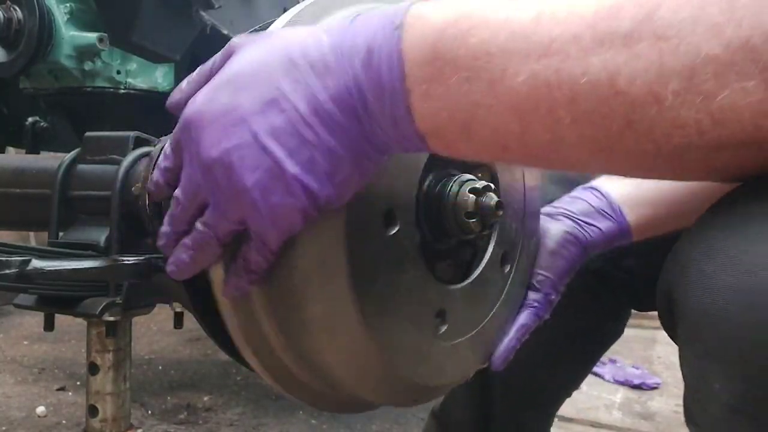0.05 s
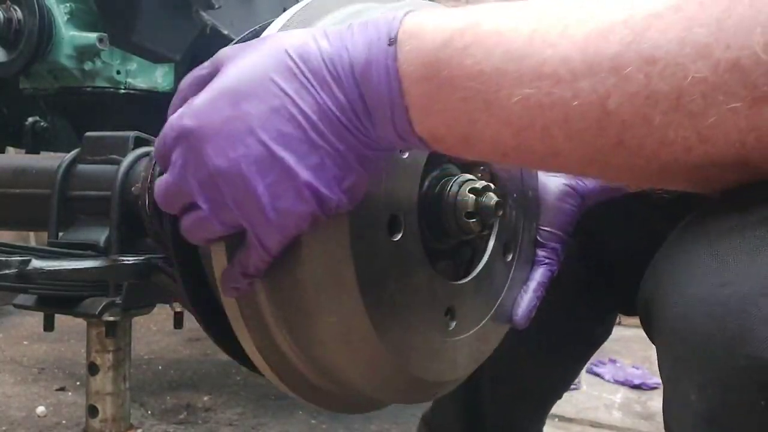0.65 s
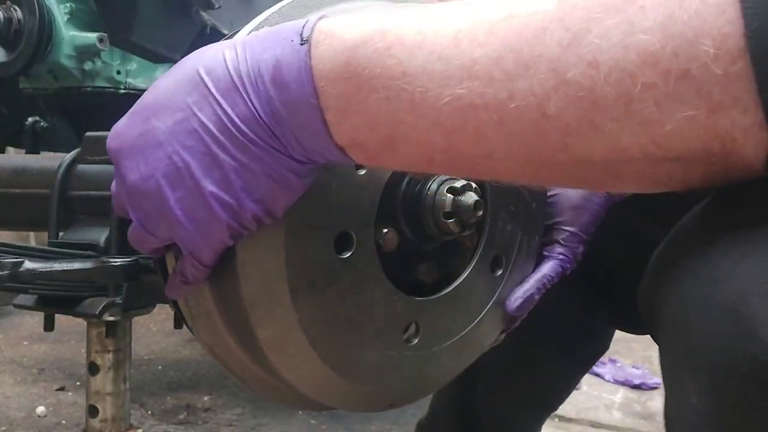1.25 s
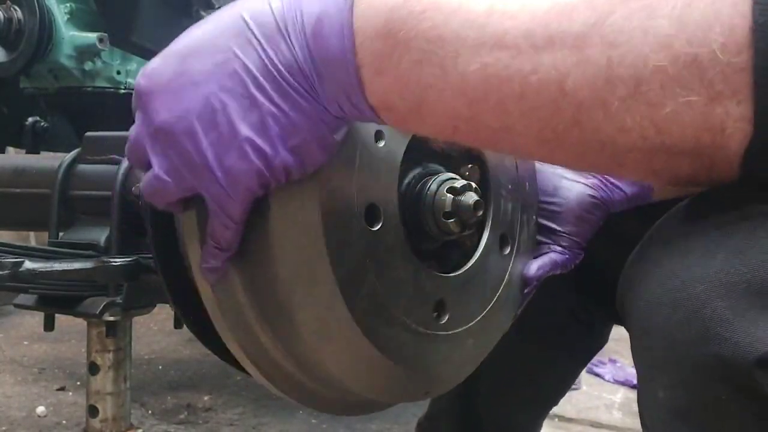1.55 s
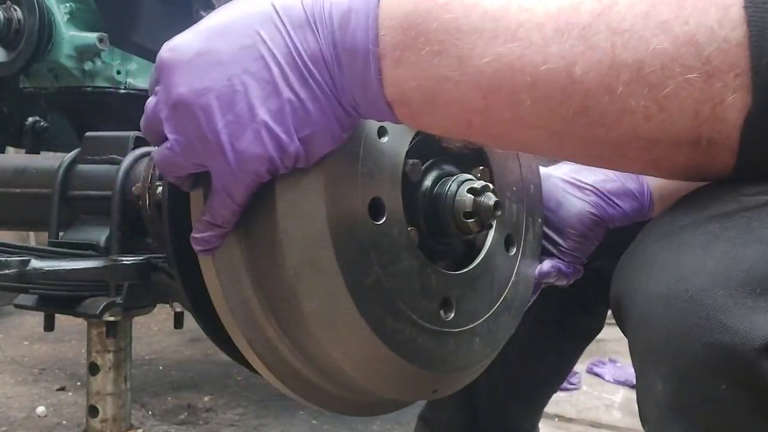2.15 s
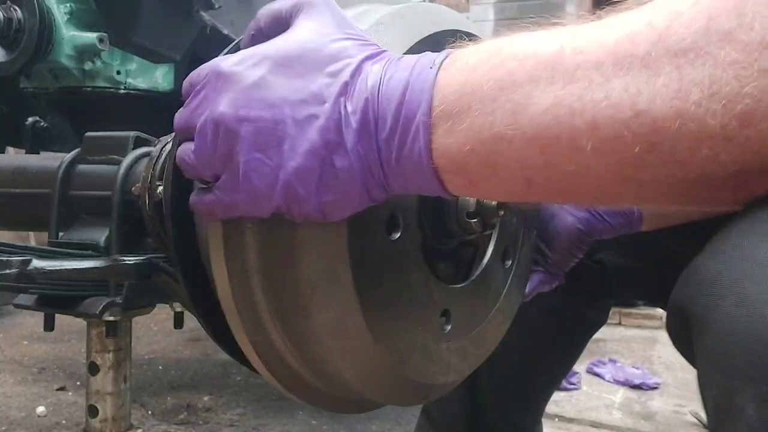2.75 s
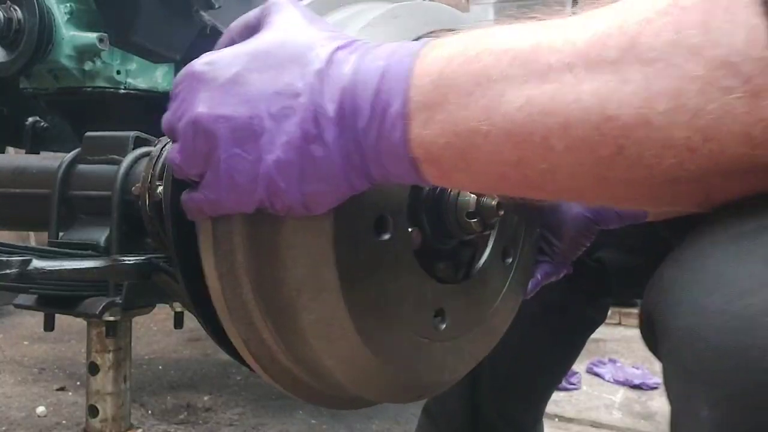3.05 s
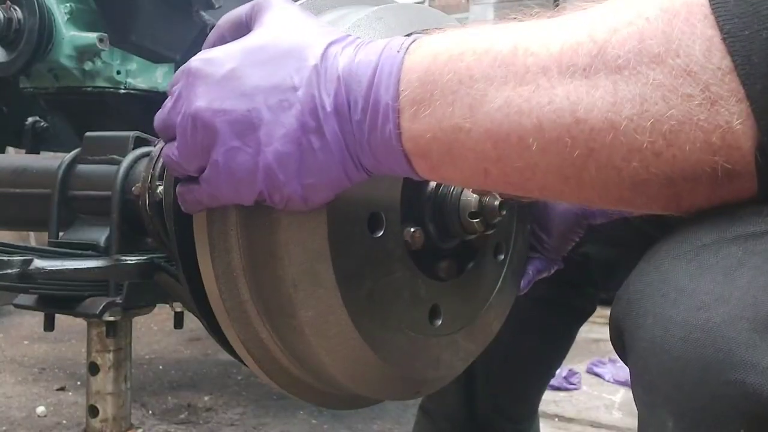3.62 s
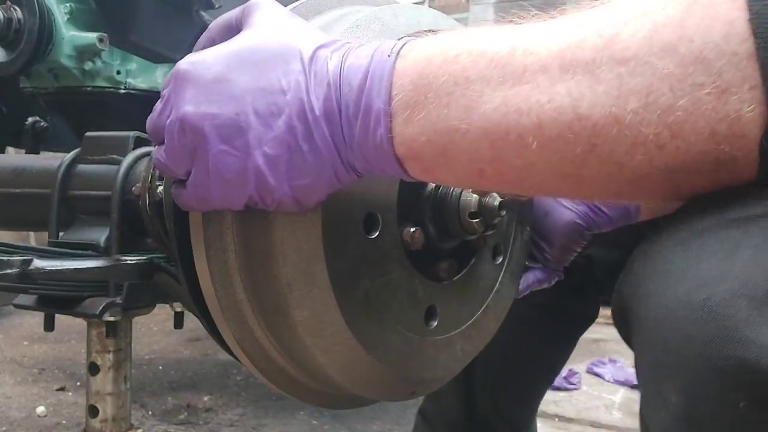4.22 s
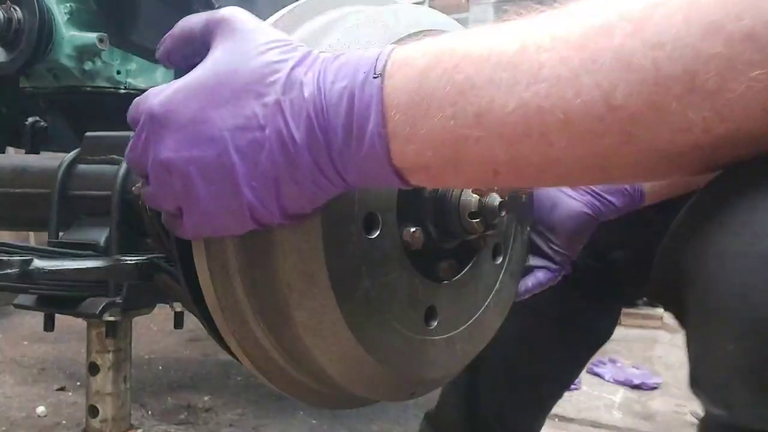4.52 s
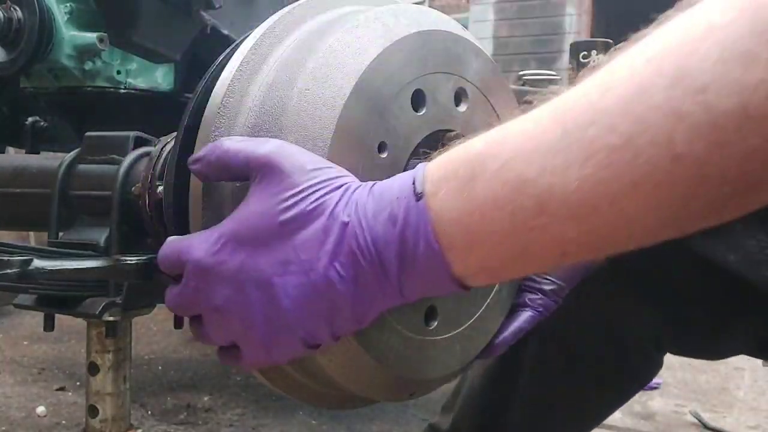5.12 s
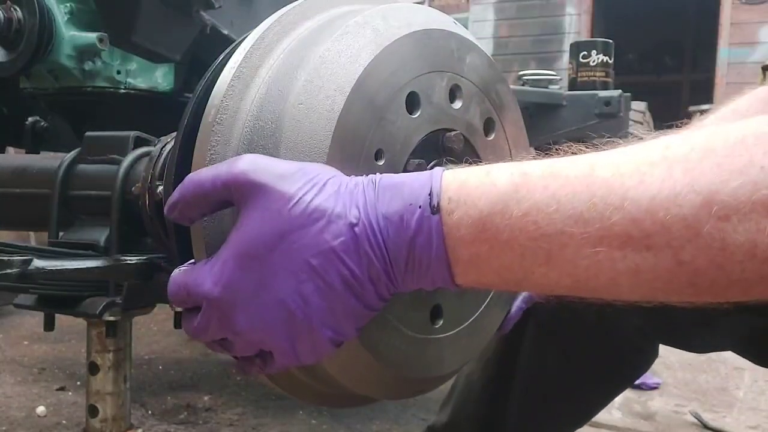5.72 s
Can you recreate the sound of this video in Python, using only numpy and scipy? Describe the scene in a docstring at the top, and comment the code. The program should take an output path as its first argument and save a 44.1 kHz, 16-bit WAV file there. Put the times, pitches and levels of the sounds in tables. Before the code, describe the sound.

A metal brake drum rubs and scrapes onto its hub, with ringing clanks, hollow bumps and swishing gloves in a quietly rumbling workshop.

```python
"""Iron rubs, clangs and bumps close by: a cast-iron brake drum is worked onto its hub in a workshop.
The drum drags over the brake shoes, judders forward in quick slips and rings when it strikes the hub.
Twisted on its seat, it bumps with a hollow note, and the axle rattles and hums.
Gloves and sleeves swish over the iron while the room rumbles quietly."""
import sys
import numpy as np
from scipy import signal
from scipy.fft import rfft, irfft, next_fast_len
from scipy.io import wavfile
from scipy.ndimage import map_coordinates

SR = 44100
rng = np.random.default_rng(int(sys.argv[2]) if len(sys.argv) > 2 else 0)


def store_pcm(level_fs):
    """Save levels as 16-bit WAV."""
    pcm = np.round(np.clip(level_fs, -1, 1) * 32767).astype(np.int16)
    wavfile.write(sys.argv[1], SR, np.atleast_2d(pcm).T)


N = 254456

# the axle's many crowded tones, heard as a rattle: f/Hz, level/dB
AXLE_RATTLE = [(40, -40.5), (100, -8.5), (230, -8), (330, 0), (480, 1), (750, 1), (950, -3), (1350, -7.5),
               (1750, -15), (3000, -15.5), (5000, -19.5), (8500, -16), (14000, -49)]


def clangs():
    """Each blow rings the drum, the shoes and their backplate, and makes the axle rattle and thud."""
    # blows: t/s, level/dB, hardness/Hz, drum ring/dB, plate ring/dB, thud/dB, thud pitch/Hz
    blows = [(1.221, -39, 262, -25, -14, -0.5, 139), (1.906, -59, 2960, 23.5, -21, -1, 190),
             (1.943, -29, 3100, -11.5, -9, 1, 278), (1.969, -34.5, 1900, 2.5, -4, 8.5, 130),
             (1.999, -40.5, 900, -17, -1, 10, 165), (2.181, -37.5, 880, -6.5, -12.5, -2, 340),
             (2.725, -49.5, 1150, -3.5, 1.5, 4.5, 300), (2.907, -50, 11700, 16.5, 4.5, 4.5, 189),
             (2.930, -53, 9000, 14, -5, 13, 330), (3.3677, -19.5, 3800, 6, -6.5, -8, 356),
             (3.374, -25, 2500, 7, -4.5, -0.5, 330), (3.879, -33, 650, -1.5, -1, 3.5, 322),
             (3.980, -51, 990, -9, -9, 3, 342), (5.539, -31, 760, -11, -24, 1.5, 164)]
    # tones of the bending drum; close neighbours throb slowly: f/Hz, level/dB, time to fade 60 dB/s
    drum_tones = [(947, -23, .28), (1082, -23, .27), (1242, -3, .39), (1252, -10.5, .44), (1305, -12, .15),
                  (1400, -8, .13), (1470, -2.5, .2), (1561, -19, .26), (2065, -15, .47),
                  (2067.8, -18.5, .47), (2073.3, -21, .47), (2110, -22, .25), (2748, -15, .21),
                  (3118, -9.5, .34), (3128, -18, .28), (3890, -21, .23), (4115, -21, .23), (4425, -23, .3)]
    # tones of the shoes and backplate: f/Hz, level/dB, time to fade 60 dB/s
    plate_tones = [(163.3, -12, 1), (329, -2, 0.49), (388, -8, 0.17), (423, -3, 0.65), (495, -2.5, 0.57),
                   (553, 0, .42), (573, -3, .36), (662, -7, .7), (716, 1.5, .3), (998, 1.5, 0.11),
                   (1409, 6.5, 0.13)]
    # the drum sends its sound out unevenly: f/Hz, left minus right/dB
    balance = [(250, 0), (700, -2), (1050, 0), (1240, -6), (1470, 4), (2100, 0), (2750, -5), (3120, 8),
               (8000, 0)]
    out, t = np.zeros((2, N)), np.arange(SR) / SR
    for s, db, hard_hz, drum_db, plate_db, thud_db, thud_hz in blows:
        # the shoes sit a little differently at every blow, which retunes them
        shoes = np.array(plate_tones) * [1 + .01 * rng.standard_normal(), 1, 1]
        drum = ring(drum_tones, hard_hz, rough=.4)
        # a very hard, glancing touch barely stirs the drum's low tones
        drum = filtered(drum, lambda hz: 1 / np.hypot(1, (hard_hz / (6 * hz + 1)) ** 2))
        iron = amp(drum_db) * drum + amp(plate_db) * ring(shoes, hard_hz, rough=.6)
        rattle = wash(colour(AXLE_RATTLE), hard_hz, fade=.18, room_db=-8, attack_s=.0007)
        thud = wash(hump(thud_hz, octaves=.43), hard_hz=700, fade=.21, room_db=-11, attack_s=.0026)
        add(out, s, amp(db) * (iron + rattle + amp(thud_db) * thud))
    return filtered(out, lambda hz: amp(along(balance, hz) * np.array([[.5], [-.5]])))


def bumps():
    """The drum meets its seat: a clack, then its hollow swells into a lower note as the axle rattles."""
    # bumps on the seat: t/s, level/dB, body/dB, treble/dB
    hits = [(3.794, -30.5, 1.5, -0.5), (4.096, -28.5, -1.5, -8.5), (4.303, -34.5, 3.5, -8.5),
            (5.5045, -24.5, 1.5, 1), (5.677, -30, 0, -19)]
    # tones of the hollow, the low ones mostly later: f/Hz, level/dB, time to peak/s, narrowness of swell
    hollow_tones = [(333, -26.5, 0.026, 1.2), (390, -10.5, 0.018, 0.71), (421, -6, 0.027, 8.1),
                    (551, -3, 0.055, 6.8), (589, -2, 0.018, 6.5), (700, -4, 0.0079, 0.27),
                    (758, 0.5, 0.0073, 2.9), (999, -6.5, 0.0033, 0.23), (1238, -4, 0.0029, 0.79),
                    (1310, -12, 0.0049, 0.22)]
    # top of the body range, the neutral middle, start of the full treble: f/Hz
    bands = [610, 714, 1190]
    out, t = np.zeros((2, N)), np.arange(SR) / SR
    for s, db, body_db, treble_db in hits:
        sound = amp(-2) * wash(colour(AXLE_RATTLE), hard_hz=1760, fade=.25, room_db=-3, attack_s=.0012)
        for hz, tone_db, peak_s, narrow in hollow_tones:
            swell = (t / peak_s * np.exp(1 - t / peak_s)) ** narrow
            phase = rng.uniform(0, 2 * np.pi) + .7 * stereo_phase(hz) + .45 * waver(t)
            strength = amp(tone_db + rng.standard_normal())
            sound += strength * swell * np.sin(2 * np.pi * hz * t + phase)
        tilt = colour(list(zip(bands, [body_db, 0, treble_db])))
        add(out, s, amp(db) * filtered(sound, tilt))
    return out


def shove():
    """One hard shove makes the drum judder over the shoes in quick, uneven slips."""
    # the hard push: t/s, held/s, level/dB
    push = [(1.906, 0.047, -26)]
    # tone colour of grinding iron: f/Hz, level/dB
    grind = [(88, -2.5), (150, -3.5), (281, -5), (320, -10), (402, -10.5), (725, -12), (782, -25.5),
             (1160, -7), (1260, -16.5), (1490, -8.5), (1980, -21.5), (2490, -15.5), (3440, -27),
             (4480, -24.5), (14000, -45)]
    slips = unit(amp(2.8 * wobble(170)))
    force = strokes(push, rise=1108, sag=-3, fall=130.5)
    return force * slips * noise(metallic(colour(grind), ripple_db=2.5))


def rubbing():
    """Rough iron drags on the brake linings and stirs the muffled tones of drum and shoes."""
    # pushes on the drum: t/s, held/s, level/dB
    pushes = [(0.0, 0.0055, -47), (.13, 0.14, -48), (.22, 0.047, -44), (.54, 0.055, -49), (.82, 0.077, -50),
              (1.825, 0.0066, -49.5), (2.21, 0.38, -49), (2.905, 0.059, -46), (3.35, 0.025, -44),
              (5.24, 0.11, -54.5), (5.495, 0.075, -40)]
    # tones of drum and shoes pressed together: f/Hz, width/Hz, level/dB
    lining_tones = [(390, 200, -3.5), (580.3, 17.6, 7.5), (716, 50, 1.5), (1174, 135, -6.5), (1398, 77, 1),
                    (2500, 560, -16.5)]
    force = strokes(pushes, rise=298, sag=5.5, fall=123.5)
    return force * unit(filtered(friction(uneven_db=3), metallic(resonances(lining_tones), ripple_db=4)))


def scraping():
    """The rim grazes the steel edges of the shoes; every slip rings its high tones."""
    # grazes of the rim: t/s, held/s, level/dB
    grazes = [(.14, 0.043, -47.5), (.26, 0.013, -51.5), (.57, 0.018, -62), (.745, 0.012, -57),
              (.872, 0.013, -50.5), (2.592, 0.0098, -50)]
    # tones of the rim, muffled by the hands: f/Hz, level/dB
    rim_tones = [(2640, -3), (2900, 0), (3270, -2), (3580, 1.5), (3800, 1.5), (4250, -2), (4440, -3)]
    width_hz = 45
    rim = resonances([(hz, width_hz, db) for hz, db in rim_tones])
    force = strokes(grazes, rise=450, sag=0, fall=222)
    return force * unit(filtered(friction(uneven_db=5), rim))


def brief_sounds():
    """Scuffs, squeaks, brief rings of the drum, the sharp cracks of knocks, and ticks of grit."""
    # scuffs, squeaks, rings and cracks: t/s, level/dB, f/Hz, width/octaves, time to fade 60 dB/s
    bursts = [(.104, -48, 2600, 0.61, 0.16), (.143, -38, 3930, 11, 0.1), (.812, -50, 720, 1.2, 0.16),
              (1.905, -25, 1385, 0.092, 0.25), (1.905, -25, 2060, 0.11, 0.17),
              (1.942, -36.5, 3800, 0.46, 0.088), (1.945, -22.5, 1298, 0.031, 0.29),
              (1.945, -26, 1469, 0.0086, 0.34), (2.181, -36.5, 636, 0.3, 0.056), (2.26, -43, 715, .08, .16),
              (2.723, -42, 4100, 0.12, 0.09), (2.908, -37, 2200, 0.81, 0.053),
              (2.908, -42.5, 2110, .025, 0.24), (3.29, -51.5, 940, 0.83, 0.98),
              (3.369, -37.5, 4380, 0.35, 0.054), (3.878, -30, 1550, 0.56, 0.036),
              (4.096, -41, 1130, 0.87, 0.035), (5.23, -40, 477, 3, 0.35), (5.505, -32.5, 1450, 0.69, 0.066)]
    # dry ticks of grit and glove rubber: t/s, level/dB
    ticks = [(1.447, -46), (2.597, -40), (3.662, -47), (4.821, -42), (5.032, -47), (5.246, -33.5)]
    out = np.zeros((2, N))
    for s, db, centre_hz, octaves, fade_s in bursts:
        add(out, s, amp(db) * burst(centre_hz, octaves, fade_s))
    for s, db in ticks:
        add(out, s, amp(db) * burst(centre_hz=5400, octaves=2.4, fade_s=.02))
    return out


def axle_hum():
    """One low tone of the axle swells, wavers and is stilled again by the hands."""
    # hums after the shove and the blows: t/s, held/s, level/dB
    hums = [(2.0, 0.15, -34.5), (3.54, 0.025, -36.5), (3.68, 0.02, -45.5), (3.93, 0.34, -48)]
    pitch_hz = 159
    tone = unit(np.sin(2 * np.pi * pitch_hz * np.arange(N) / SR + wobble(25)))
    return tone * strokes(hums, rise=263, sag=19, fall=144)


def swish():
    """Gloves and sleeves slide over dusty iron with a grainy, uneven hiss."""
    # hand movements: t/s, held/s, level/dB
    slides = [(0.0, 0.025, -54), (.14, 0.025, -43.5), (.21, 0.073, -51), (.37, 0.017, -49),
              (.535, 0.055, -46.5), (.755, 0.03, -46), (.86, 0.025, -48.5), (.96, .11, -52),
              (1.14, .14, -68), (1.295, 0.013, -61), (1.41, 0.043, -53), (1.555, 0.039, -58),
              (1.7, 0.091, -49.5), (1.925, 0.15, -47), (2.17, 0.79, -53), (2.59, 0.14, -48),
              (2.905, 0.035, -49.5), (3.01, 0.075, -58.5), (3.14, 0.053, -65), (3.33, 0.045, -55.5),
              (3.5, 0.09, -51.5), (3.66, .01, -56.5), (3.8, 0.11, -60.5), (4.31, 0.011, -66),
              (4.44, 0.19, -68), (4.65, 0.054, -57.5), (4.86, 0.0047, -52.5), (4.98, .1, -60.5),
              (5.12, 0.127, -54.5), (5.255, 0.17, -42.5), (5.51, 0.044, -40.5), (5.765, .01, -51.5)]
    # tone colour of cloth on iron: f/Hz, level/dB
    cloth = [(300, -21), (900, -4.5), (1900, -1.5), (3600, 0), (5500, -2), (8000, -3.5), (9500, -8),
             (11500, -4), (14500, -10)]
    grain = unit(amp(1.8 * wobble(1500) + 1.4 * wobble(80) + .7 * wobble(22)))
    hiss = noise(metallic(colour(cloth), ripple_db=2.2))
    speed = strokes(slides, rise=206, sag=13, fall=140)
    return speed * grain * hiss * amp([[.5], [-.5]])  # slightly to the left


def workshop():
    """A low rumble swells when the axle rocks on its spring; the room hisses faintly."""
    # shifts of weight that rock the axle: t/s, held/s, level/dB
    heaves = [(0.0, 0.27, -43), (.9, 0.047, -50), (1.26, 0.017, -41.5), (1.97, 0.061, -38),
              (2.3, 0.82, -44.5), (3.42, 0.21, -40), (3.9, 1.2, -51.5), (5.54, 0.26, -44)]
    # tone colour of the rumble: f/Hz, level/dB
    rumble = [(20, -45.5), (33, -17), (45, 1), (55, 3.5), (65, 0), (77, 4.5), (95, -7.5), (130, -9),
              (160, -11.5), (200, -22.5), (330, -16), (600, -30.5), (1200, -93.5)]
    # tone colour of the room's steady hiss: f/Hz, level/dB
    air = [(25, -28.5), (100, 2.5), (330, -9), (600, -10.5), (1200, -15), (2300, -26), (3000, -46.5),
           (8000, -31.5), (9500, -42.5), (12000, -31), (15000, -34)]
    resting_db, air_db = -48.5, -57
    rocking = strokes(heaves, rise=289.5, sag=2.5, fall=48)
    return np.hypot(amp(resting_db), rocking) * noise(colour(rumble)) + amp(air_db) * noise(colour(air))


def ring(tones, hard_hz, rough):
    """One second of struck iron: its tones start nearly in step, waver under the hands and fade."""
    t = np.arange(SR) / SR
    out = np.zeros((2, SR))
    for hz, db, fade_s in tones:
        phase = .5 * rng.standard_normal() + stereo_phase(hz) + rough * waver(t)
        strength = amp(db + rng.standard_normal()) * contact(hz, hard_hz)
        out += strength * amp(-60 * t / fade_s) * np.sin(2 * np.pi * hz * t + phase)
    return out * (1 - np.exp(-t / .0011))


def wash(response, hard_hz, fade, room_db, attack_s):
    """One second of crowded tones: a quick burst whose treble dies first, then the room's echo."""
    # the workshop's echo: f/Hz, time to fade 60 dB/s
    echo_times = [(70, 2.5), (170, 0.96), (500, 0.71), (1200, 0.54), (4000, 0.82), (12000, 0.272)]
    hz, t, spectrum = signal.stft(noise(response, size=SR), SR, nperseg=256)
    hz = hz[:, None]
    direct = amp(-60 * t / fade * (1 + hz / 1000) ** .13)
    echo = amp(room_db - 60 * t / along(echo_times, hz))
    sound = signal.istft(spectrum * np.hypot(direct, echo) * contact(hz, hard_hz), SR, nperseg=256)[1]
    return sound[:, :SR] * (1 - np.exp(-np.arange(SR) / SR / attack_s))


def burst(centre_hz, octaves, fade_s):
    """One second of fading noise around one pitch, with a faint echo. Low bursts start more softly."""
    t = np.arange(SR) / SR
    echo = amp(-19 - 60 * t / .4)
    attack = 1 - np.exp(-2 * t * centre_hz)
    return noise(hump(centre_hz, octaves), size=SR) * (amp(-60 * t / fade_s) + echo) * attack


def contact(hz, hard_hz):
    """A soft touch lasts longer, so it stirs less treble."""
    return 1 / np.sqrt(1 + (hz / hard_hz) ** 4.5)


def friction(uneven_db):
    """The force of sliding on rough iron: a stream of tiny slips of unequal size."""
    return amp(uneven_db * wobble(260)) * noise(np.ones_like)


def strokes(rows, rise, sag, fall):
    """Loudness of movements that swell, sag while held and die. Slopes: dB/s at the top, steeper below."""
    t = np.arange(0, N, 32) / SR
    power = np.zeros(len(t))
    for s, held, db in rows:
        drop = rise * np.maximum(s - t, 0) + sag * np.clip(t - s, 0, held)
        drop += fall * np.maximum(t - s - held, 0)
        power += amp(db - drop * (1 + drop / 93)) ** 2  # a drop of 93 dB is doubled
    return np.interp(np.arange(N) / SR, t, np.sqrt(power))


def resonances(tones):
    """Response (gain at each frequency) of an object that rings at the given tones."""
    return lambda hz: sum((-1) ** k * amp(db) * 1j * hz * width / (centre ** 2 - hz ** 2 + 1j * hz * width)
                          for k, (centre, width, db) in enumerate(tones))


def metallic(response, ripple_db):
    """The crowded high tones of iron cut fine peaks and dips into a response."""
    grid = np.arange(0, SR / 2, 45)
    ripple = rng.standard_normal(len(grid)) * (grid > 1600)
    return lambda hz: response(hz) * amp(ripple_db * np.interp(hz, grid, ripple))


def hump(centre_hz, octaves):
    """Response with one rounded peak."""
    away = lambda hz: np.log2((hz + 1) / centre_hz) / octaves
    return lambda hz: (1 + away(hz) ** 2) ** -1.3 * np.exp(-away(hz) ** 2 / 12)


def colour(points):
    """Response drawn through points of f/Hz, level/dB."""
    return lambda hz: amp(along(points, hz))


def noise(response, size=N):
    """Stereo noise shaped by a response, nearly the same on both sides in the bass."""
    white = rng.standard_normal((2, size))
    mid, side = filtered(white, lambda hz: response(hz) * [np.cos(spread(hz)), np.sin(spread(hz))])
    return unit(np.array([mid + side, mid - side]))


def spread(hz):
    """Angle that sets how much left and right differ."""
    # how alike the two sides sound: f/Hz, likeness (1 = the same)
    likeness = [(60, 0.99), (130, 0.96), (260, 0.79), (500, 0.73), (800, 0.12), (1200, 0.051), (14000, 0)]
    return np.arccos(np.clip(along(likeness, hz), -1, 1)) / 2


def stereo_phase(hz):
    """Puts a tone ahead on one side, picked at random, and behind on the other."""
    return spread(hz) * rng.choice([-1, 1]) * np.array([[1], [-1]])


def waver(t):
    """A random drift over one second."""
    return np.interp(t, np.linspace(0, 1, 70), rng.standard_normal(70))


def wobble(rate):
    """A smooth curve through `rate` random points a second."""
    return map_coordinates(rng.standard_normal(int(N * rate / SR) + 4), [np.arange(N) * rate / SR])


def filtered(x, response):
    """Turn each frequency of x up or down by a response."""
    n = x.shape[-1]
    padded = next_fast_len(n + 8192)
    return irfft(rfft(x, padded) * response(np.fft.rfftfreq(padded, 1 / SR)), padded)[..., :n]


def along(points, hz):
    """Read between (frequency, value) points on a pitch scale."""
    freqs, values = np.transpose(points)
    return np.interp(np.log(hz + 1), np.log(freqs + 1), values)


def add(track, s, sound):
    """Mix a sound into the track from time s."""
    part = track[:, round(s * SR):][:, :sound.shape[1]]
    part += sound[:, :part.shape[1]]


def amp(db):
    """Turn decibels into a gain."""
    return 10 ** (np.asarray(db) / 20)


def unit(x):
    """Scale to an average power of 1."""
    return x / np.sqrt(np.mean(x ** 2) + 1e-20)


def scene():
    """The drum, the hands that work it and the room."""
    short = clangs() + bumps() + brief_sounds()
    return short + axle_hum() + shove() + rubbing() + scraping() + swish() + workshop()


def record(dry):
    """The microphone weakens the deepest bass, and the highest treble is cut off."""
    low_hz, top_hz = 40, 14700
    return filtered(dry, lambda hz: (hz < top_hz) * (hz / low_hz) ** 3 / np.sqrt(1 + (hz / low_hz) ** 6))


dry = scene()
out = record(dry)
store_pcm(out)
```